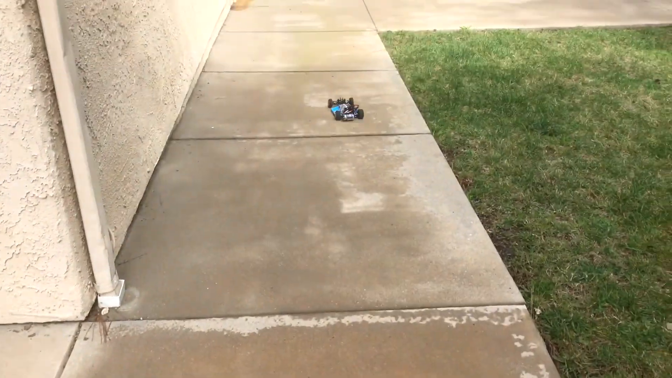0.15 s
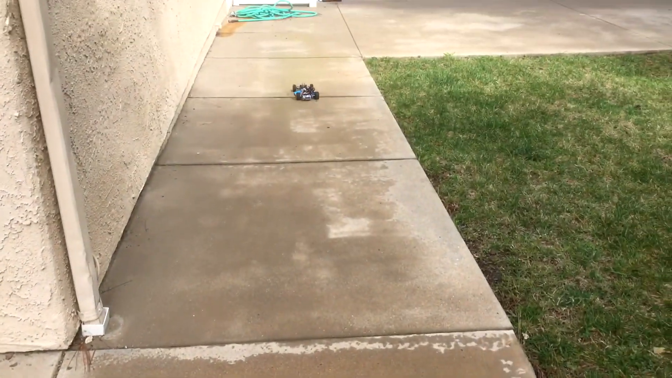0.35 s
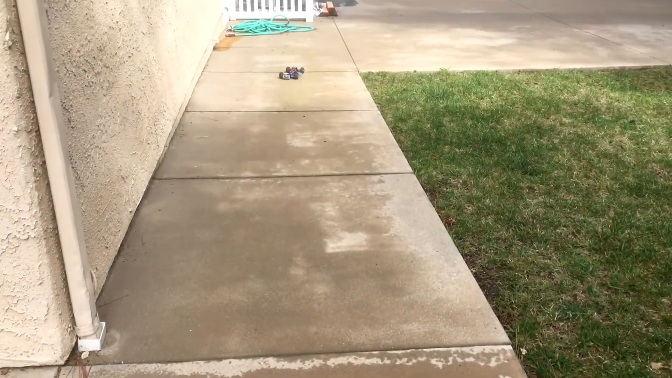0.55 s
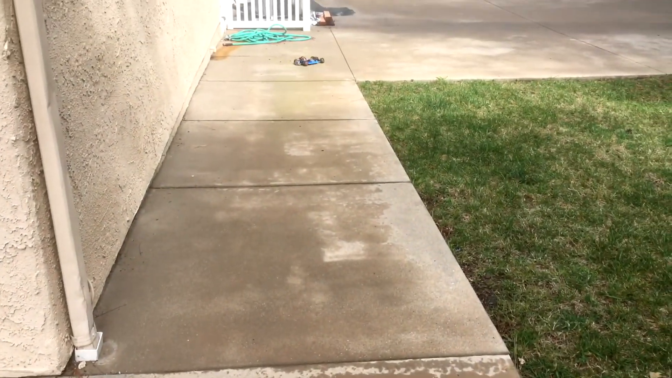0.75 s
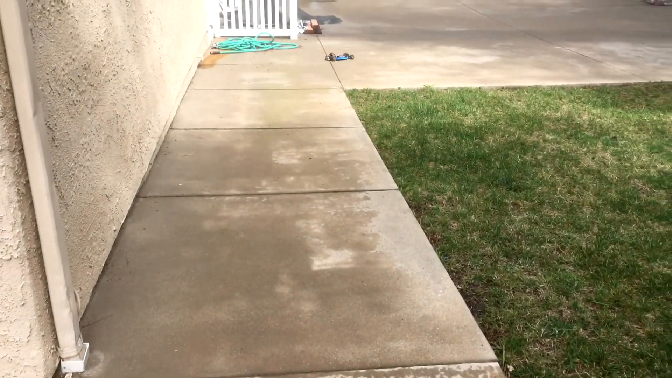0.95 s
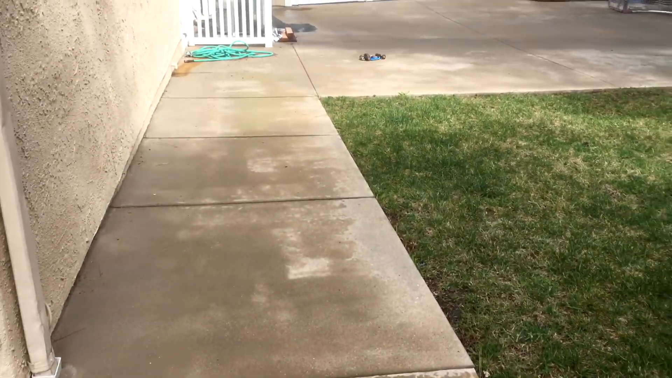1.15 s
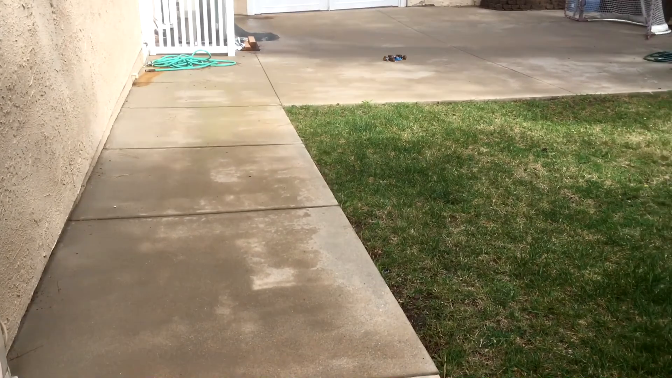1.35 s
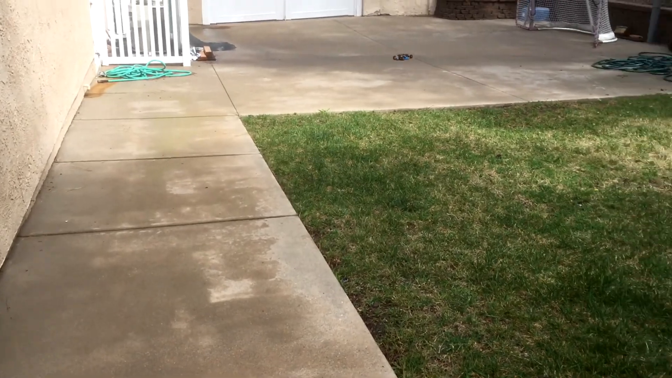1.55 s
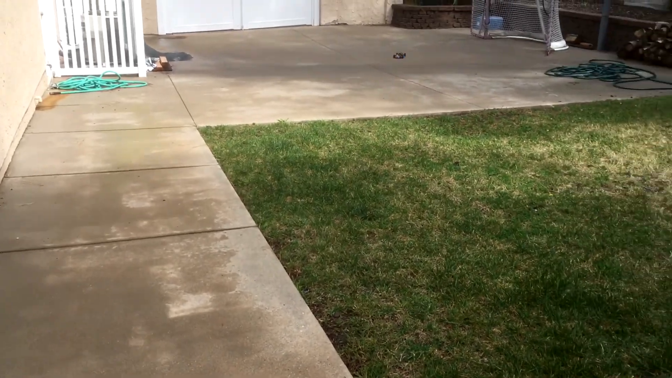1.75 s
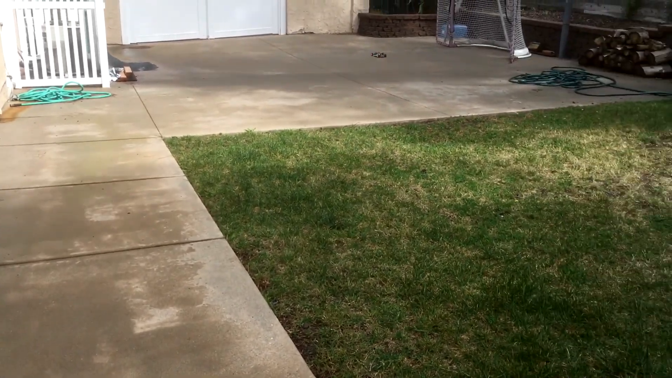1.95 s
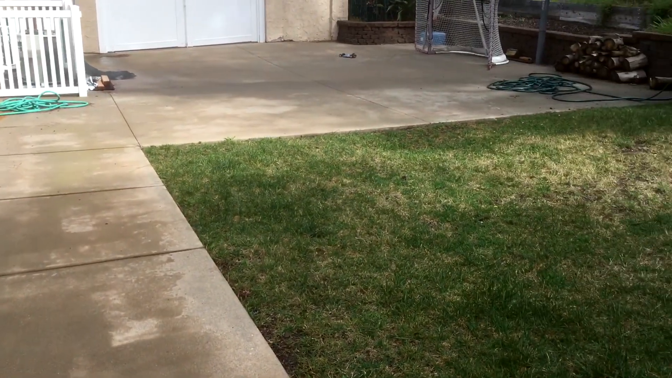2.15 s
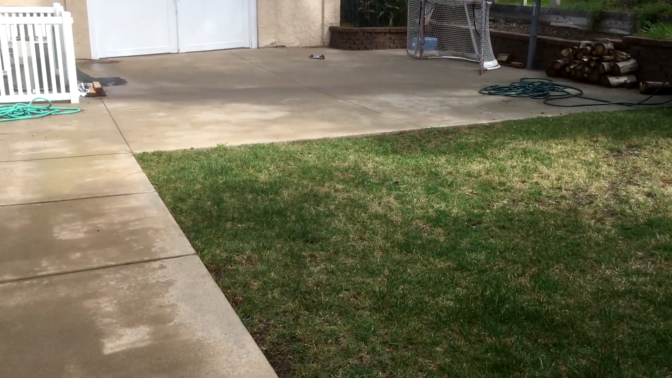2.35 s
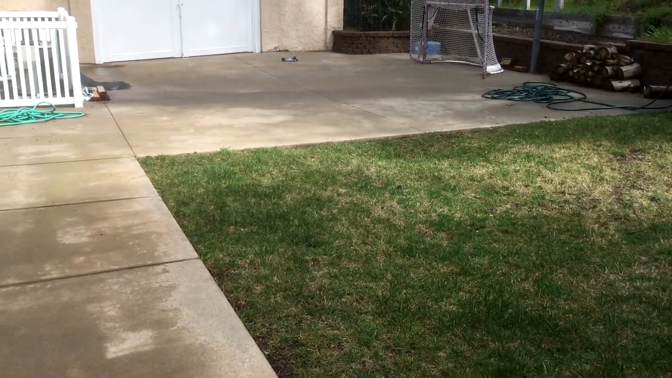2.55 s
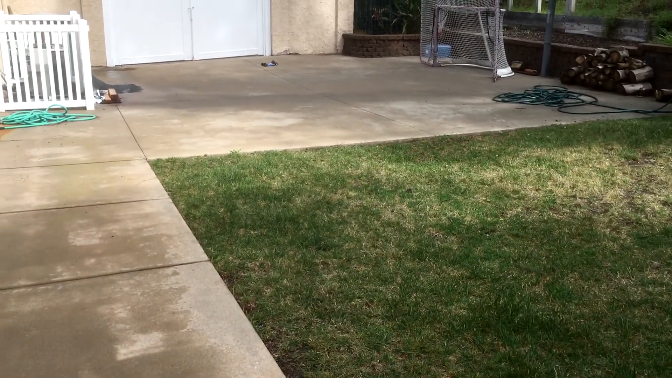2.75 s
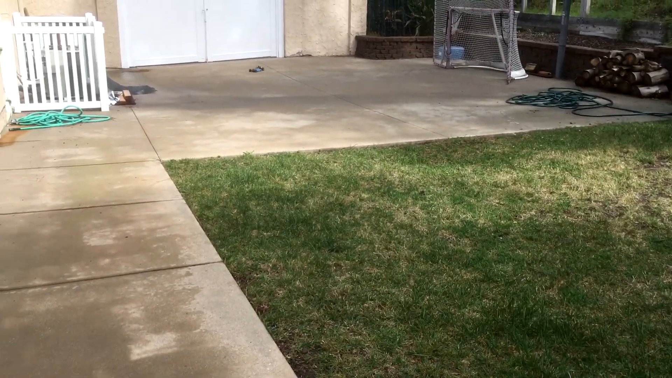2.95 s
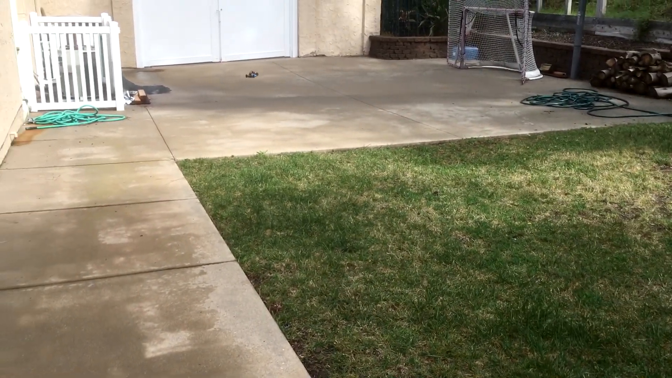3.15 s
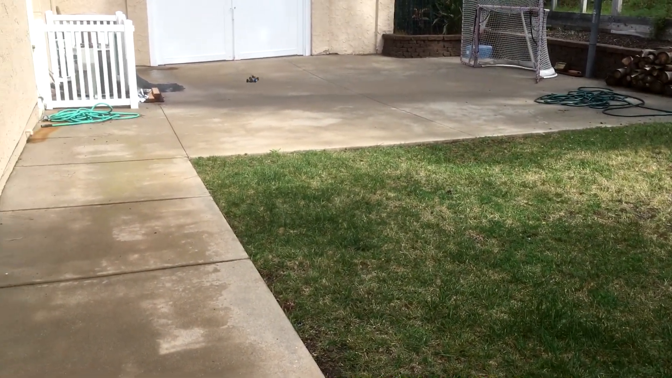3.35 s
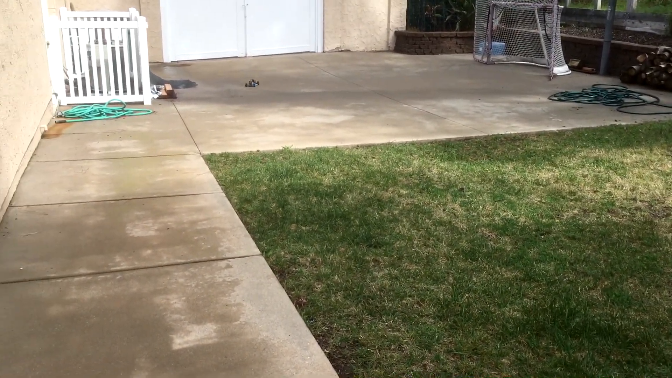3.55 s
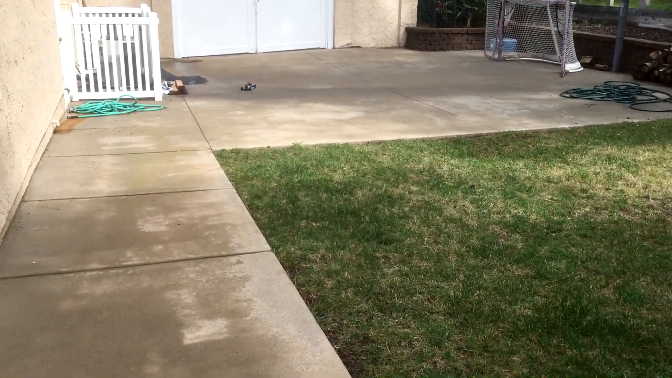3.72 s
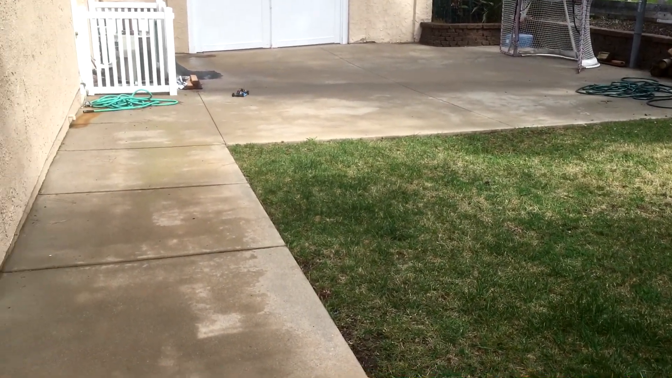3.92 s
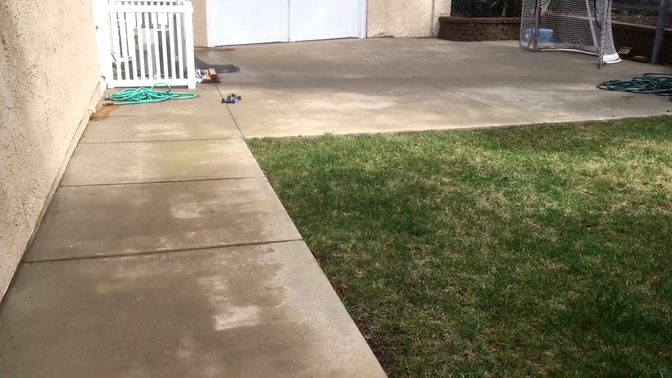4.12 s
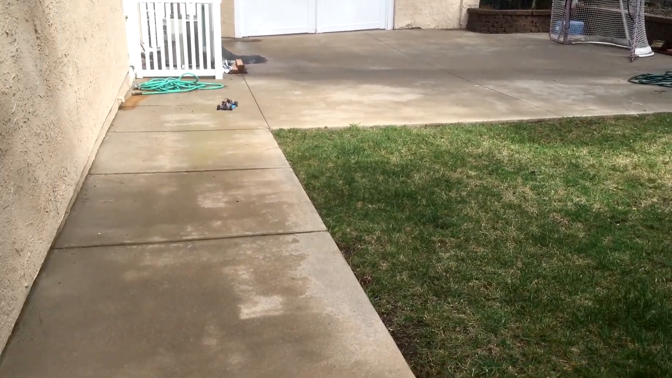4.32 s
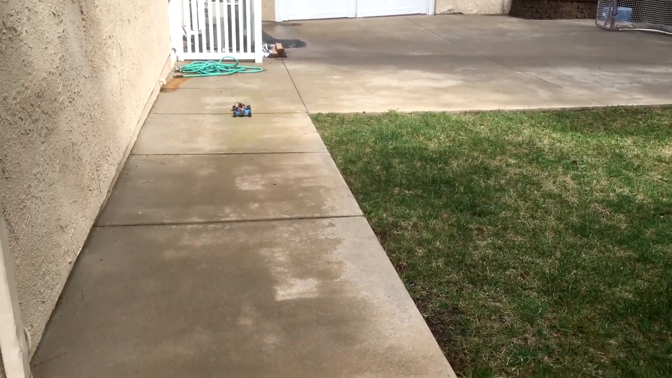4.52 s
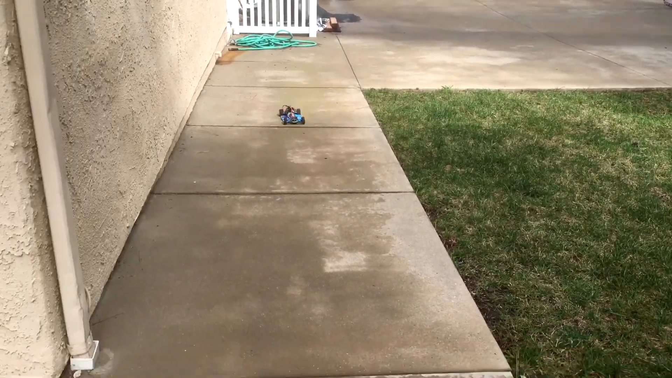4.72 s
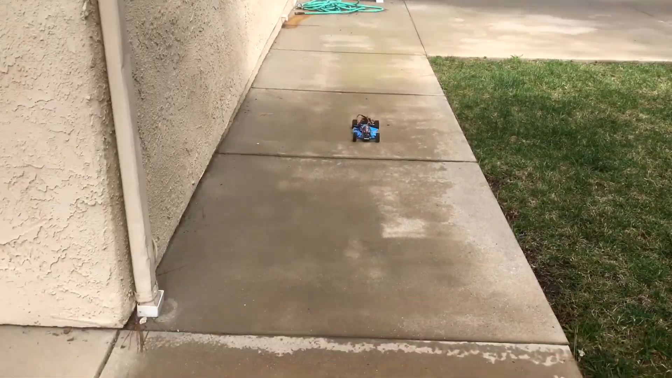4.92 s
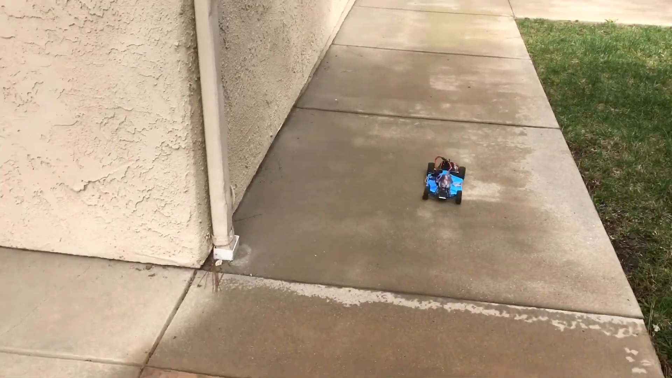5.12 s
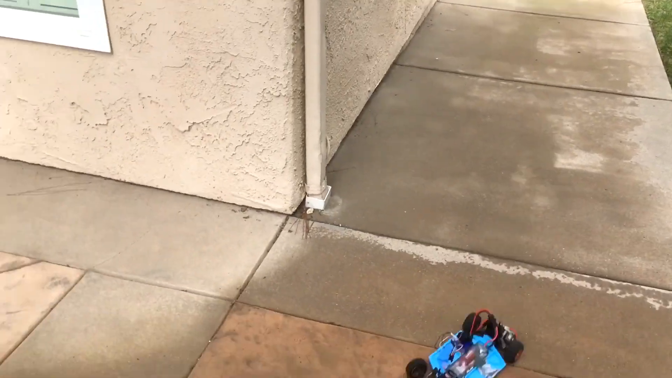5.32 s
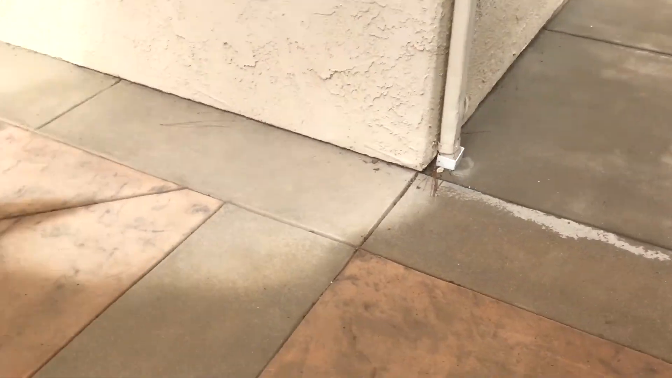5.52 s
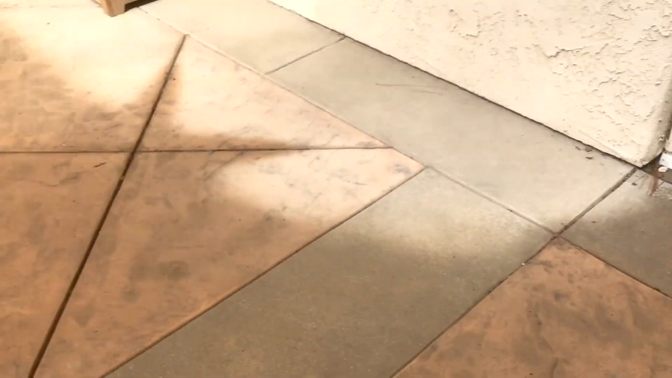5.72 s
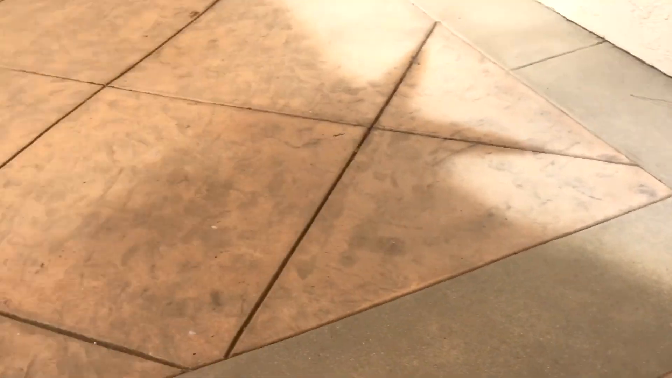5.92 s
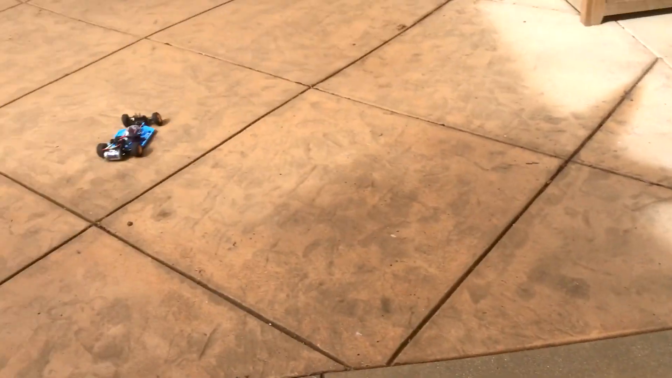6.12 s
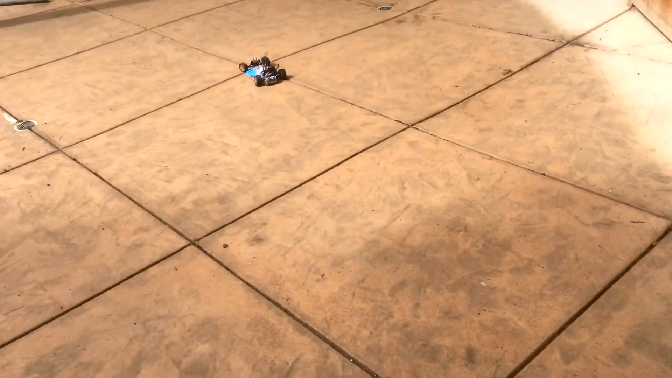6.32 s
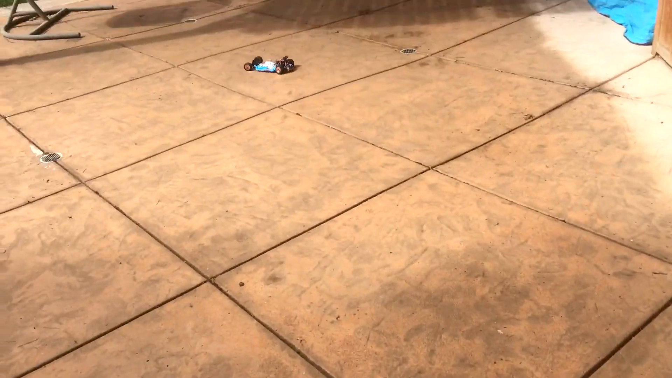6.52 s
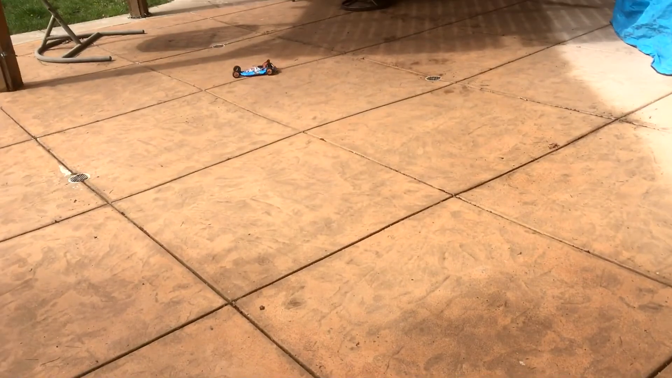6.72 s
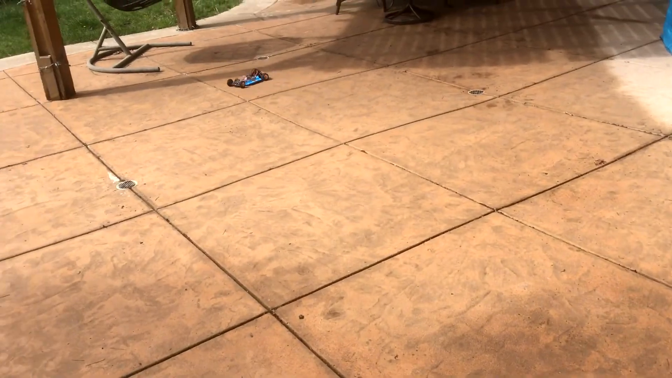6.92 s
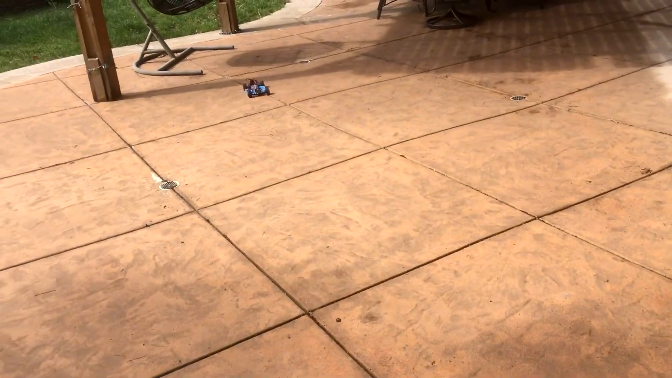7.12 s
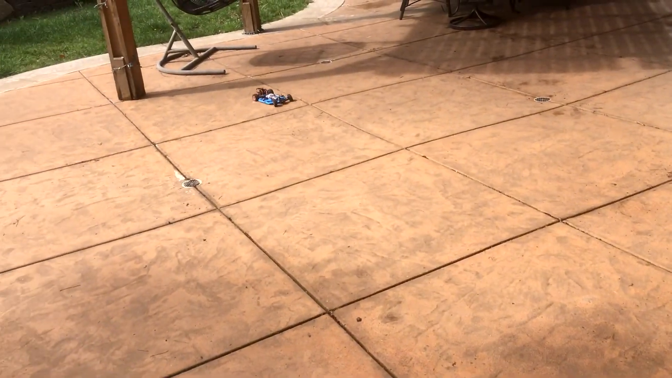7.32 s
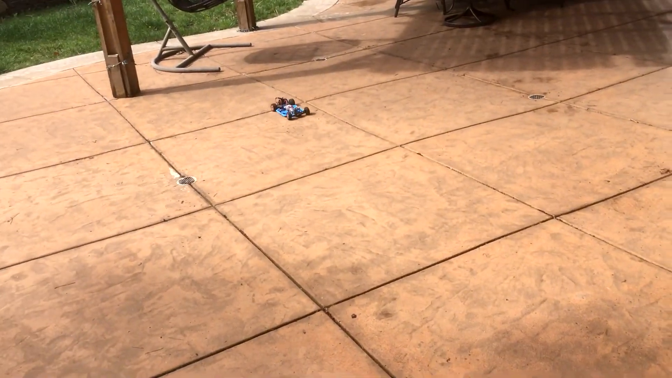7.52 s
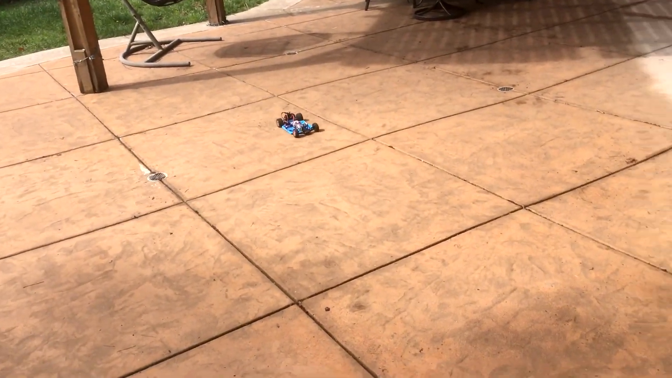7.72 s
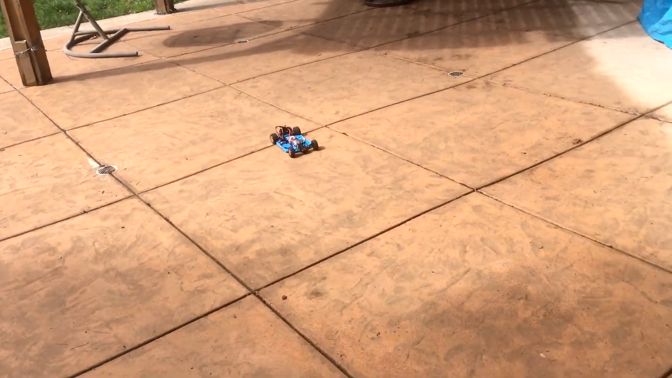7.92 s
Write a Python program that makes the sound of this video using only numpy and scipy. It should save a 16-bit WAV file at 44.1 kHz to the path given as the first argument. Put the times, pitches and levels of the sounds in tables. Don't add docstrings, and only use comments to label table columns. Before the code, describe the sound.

A small electric model car whines and rattles away over concrete, turns far off, returns fast, clatters past close over joints, then slows and picks up again.

```python
import sys
import numpy as np
from scipy import signal
from scipy.fft import rfft, irfft, next_fast_len
from scipy.io import wavfile
from scipy.ndimage import uniform_filter1d, map_coordinates

SR = 44100
rng = np.random.default_rng(int(sys.argv[2]) if len(sys.argv) > 2 else 0)


def volts_from_db(level):
    exponent = np.asarray(level, float) / 20
    return 10 ** exponent


def output_pcm(signal):
    pcm = np.clip(np.atleast_2d(signal).T, -1, 1) * 32767
    wavfile.write(sys.argv[1], SR, np.round(pcm).astype(np.int16))


N = 355887


def unit(x):
    return x / np.sqrt(np.mean(x ** 2) + 1e-20)


def curves(rows):
    times, *columns = np.transpose(rows)
    return [np.interp(np.arange(N) / SR, times, column) for column in columns]


def wobble(rate):
    knots = rng.standard_normal(int(N * rate / SR) + 4)
    return map_coordinates(knots, [np.arange(N) * rate / SR])


def swells(rows):
    centre, width = np.transpose(rows)[:2, :, None]
    t = np.arange(0, N, 16) / SR
    bells = np.exp(-0.5 * ((t - centre) / width) ** 2)
    return np.repeat(bells, 16, axis=1)[:, :N]


def swelling(rows, column):
    return np.transpose(rows)[column] @ swells(rows)


def filtered(x, response):
    size = next_fast_len(N + 8192)
    spectrum = rfft(x, size) * response(np.fft.rfftfreq(size, 1 / SR))
    return unit(irfft(spectrum, size)[:N])


def colour(points):
    f, db = np.transpose(points)
    return lambda hz: volts_from_db(np.interp(np.log(hz + 1), np.log(f), db))


def ringing(modes, order=1):
    def response(f):
        total = 0
        for k, (centre, width, db) in enumerate(modes):
            damping = 1j * f * width
            sign = (-1) ** k
            total = total + sign * volts_from_db(db) * damping / (centre ** 2 - f ** 2 + damping + 1)
        return total ** order
    return response


def rush(patchy_db):
    z = signal.stft(rng.standard_normal(N), nperseg=512)[2]
    field = uniform_filter1d(rng.standard_normal(z.shape), size=6, axis=0)
    field = uniform_filter1d(field, size=12, axis=1)
    return signal.istft(z * volts_from_db(patchy_db * unit(field)), nperseg=512)[1][:N]


def slide(x, shift_hz):
    turning = np.exp(2j * np.pi * np.cumsum(shift_hz) / SR)
    return np.real(signal.hilbert(x, next_fast_len(N))[:N] * turning)


# (f/Hz, level/dB)
BUFFET_COLOUR = [(12, -45), (20, -34), (39, 2.5), (59, 8.5), (151, -7), (176, -43), (200, -30), (260, -39),
                 (440, -120)]
# (f/Hz, level/dB)
YARD_COLOUR = [(60, -28), (100, -7), (350, -2), (550, -5.5), (950, 1), (1700, -6), (2400, -7),
               (4500, -11.5), (6400, -5.5), (7900, -10.5), (9200, -4), (10400, -10), (13000, -10)]
# (t/s, half width/s, level/dB)
GUSTS = [(0.04, 0.022, -57), (0.5, 0.029, -56), (0.76, 0.04, -60), (1.02, 0.042, -54), (1.22, 0.048, -56),
         (1.37, 0.025, -44), (1.51, 0.022, -44), (3.299, .2, -71.5), (3.6, 0.03, -49), (3.84, .06, -57),
         (4.22, 0.04, -43), (4.379, .03, -60), (4.92, 0.084, -67), (6.94, 0.057, -55), (7.91, 0.051, -61)]
# (t/s, level/dB)
BREEZE = [(0, -61.5), (5.0, -58.5), (5.5, -68), (6.8, -68), (7.1, -61.5)]


def air():
    buffet = filtered(rng.standard_normal(N) * volts_from_db(1.4 * wobble(18)), colour(BUFFET_COLOUR))
    wind = volts_from_db(np.transpose(GUSTS)[2]) @ swells(GUSTS) + volts_from_db(curves(BREEZE)[0])
    hum = filtered(rush(1.0), colour(YARD_COLOUR))
    return volts_from_db(-4) * wind * buffet + volts_from_db(-48) * hum


# (t/s, lag/ms, level/dB)
WALL_ECHO = [(0.0, 1.46, -22), (0.38, 0.787, -11), (0.62, 0.505, -14), (0.8, 0.5, -14), (1.06, 0.76, -11),
             (1.75, 2.0, -14), (2.0, 2.28, -22), (2.4, 2.05, -20), (3.4, 1.25, -21), (4.4, 0.644, -13),
             (4.6, 0.452, -22), (5.0, 0.452, -30), (5.4, 0.3, -22), (5.65, 0.24, -20), (5.9, 0.35, -16),
             (6.25, 0.27, -12), (6.6, 0.3, -30)]
# (t/s, lag/ms, level/dB)
GARAGE_ECHO = [(2.3, 1.22, -30), (2.6, 1.23, -20), (2.98, 1.14, -22), (3.25, 0.945, -22), (3.4, 0.86, -15),
               (3.85, 0.614, -15), (4.1, 0.614, -30)]


def walls(x):
    dulled = signal.filtfilt([0.8, 0.2], 1, x)
    out, power = x.copy(), 1
    for rows in (WALL_ECHO, GARAGE_ECHO):
        lag_ms, echo_db = curves(rows)
        gain = np.minimum(volts_from_db(echo_db + 3), 0.8)
        out += gain * map_coordinates(dulled, [np.arange(N) - lag_ms * SR / 1000], order=3)
        power = power + gain ** 2
    return out / np.sqrt(power)


# (t/s, half width/s, f/Hz, level/dB)
HUMS = [(0.08, 0.088, 6250, -50), (0.67, .05, 3150, -54), (1.15, 0.2, 6540, -53), (2.63, 0.065, 1687, -55),
        (2.8, .08, 1750, -60), (3.35, .12, 6660, -55), (3.66, 0.2, 1740, -53), (3.78, 0.033, 4700, -53),
        (5.13, .08, 9500, -41), (5.48, .02, 7300, -43), (5.54, .03, 11900, -40), (5.69, .045, 5950, -42),
        (6.28, 0.049, 3033, -44), (6.3, .025, 9100, -39), (6.585, .04, 6400, -40), (6.7, 0.04, 6850, -47),
        (6.9, 0.085, 5950, -48), (7.1, 0.06, 6140, -52), (7.64, .03, 6300, -53), (7.7, 0.061, 5170, -53),
        (7.92, 0.055, 6280, -50)]


def hums():
    _, _, hz, db = np.transpose(HUMS)[:, :, None]
    blur = 0.04
    drift = 2 * np.pi * np.cumsum(1 + blur * unit(wobble(700))) / SR
    return np.sum(volts_from_db(db + 4.2 * wobble(90)) * swells(HUMS) * np.sin(hz * drift), axis=0)


# (t/s, peak level/dB, ring f/Hz, crack level/dB)
KNOCKS = [(0.4067, -32, 3150, 0), (0.599, -33, 3400, -12), (0.7137, -38, 1800, -14), (0.99, -23, 2600, -4),
          (1.8004, -38, 2980, -6), (2.64, -40, 1600, -12), (3.5698, -27, 1600, -12),
          (5.1203, -45, 3020, -1), (5.2619, -22, 2980, -9), (5.2912, -25, 2900, -4),
          (5.325, -17, 3120, -11), (5.3878, -6.5, 2400, -11), (5.451, -17, 1140, -14),
          (5.525, -21, 1320, -14), (5.5386, -15, 1050, -13), (5.5586, -17, 1150, -11),
          (5.665, -15, 1510, -12), (5.7035, -5.5, 1600, -15), (5.735, -10, 1500, -15),
          (5.8606, -4, 2520, -12), (7.7752, -25, 1500, -2), (7.91, -18.5, 1720, -19)]


def knocks():
    out, t = np.zeros(N + SR), np.arange(2000) / SR
    rise = 1 - np.exp(-t / 0.0016)
    shape = rise * volts_from_db(-60 * t / 0.035)
    for s, db, hz, crack_db in KNOCKS:
        thud_noise, crack_noise = rng.standard_normal((2, len(t)))
        dull = uniform_filter1d(thud_noise, size=6) - uniform_filter1d(thud_noise, size=40)
        ring = 0.51 * np.sin(2 * np.pi * hz * t) + 1.13 * dull
        crack = 0.21 * np.diff(crack_noise, prepend=0)
        start = round(s * SR)
        out[start:start + len(t)] += volts_from_db(db - 9.0) * shape * (ring + volts_from_db(crack_db) * crack)
    return out[:N]


# (t/s, level/dB)
SKIPS = [(.395, -2), (.586, -4), (.603, 7), (.681, -6), (.705, -11), (.732, -1), (.758, 4), (.894, 1.5),
         (1.839, 7), (1.896, 3), (3.127, -7), (3.7, 4), (4.809, 4.5), (5.053, 4), (5.083, -2), (5.119, 2),
         (5.208, 3), (5.263, 3.5), (5.279, -5), (5.296, 5), (5.318, 6.5), (5.329, 4), (5.349, 4),
         (5.375, -5), (5.429, 1), (5.441, -6), (5.47, -1), (5.49, 4), (5.504, -4), (5.539, 0), (5.562, 5.5),
         (5.605, -3), (5.665, 1), (5.706, 2), (5.817, -3), (5.941, -1), (5.976, -6), (6.297, 4),
         (6.423, 3.5), (6.637, 2.5), (7.466, 0), (7.538, 2), (7.675, -8), (7.757, 1), (7.769, -7),
         (7.778, 5), (7.788, -3), (7.813, 5), (7.877, 4), (7.895, 1), (7.938, 0)]


def skips():
    times, db = np.transpose(SKIPS)
    half_width_s = 0.003
    bell = np.exp(-0.5 * (np.arange(-800, 801) / SR / half_width_s) ** 2)
    hits = np.bincount(np.round(times * SR).astype(int), db, N)
    return signal.fftconvolve(hits, bell, "same")


# (f/Hz, width/Hz, level/dB)
TREAD = [(1600, 560, 0)]
# (f/Hz, width/Hz, level/dB)
SIDEWALL = [(640, 230, 0)]
# (f/Hz, level/dB)
SCRUB_COLOUR = [(350, -61), (700, -18), (1000, 3), (1300, 1), (1800, -3.5), (2300, -5.5), (4500, -11.5),
                (8000, -30)]
# (t/s, half width/s, tread level/dB, scrub level/dB, sidewall level/dB)
TYRE_SPELLS = [(0.0, 0.078, -56, -51.5, -54), (0.5, 0.18, -67, -57, -65), (0.78, 0.12, -67, -46.5, -48.5),
               (0.95, 0.12, -69, -47.5, -49.5), (2.13, .2, -55, -46, -54), (2.62, 0.087, -62, -84, -79),
               (3.62, 0.28, -56, -77, -55), (4.05, 0.082, -76, -58, -67), (4.55, 0.26, -45, -62, -57),
               (5.121, 0.23, -46.5, -49, -57), (5.4, 0.028, -39, -52, -43), (5.53, 0.11, -32, -35, -40.5),
               (5.73, 0.056, -29, -36.5, -38), (5.859, 0.051, -34, -41, -43), (6.0, 0.083, -35.5, -57, -57),
               (6.2, 0.1, -36, -53, -74), (6.48, 0.068, -43, -55, -69), (6.62, 0.12, -47, -43.5, -58),
               (6.97, 0.12, -42.5, -53, -67), (7.37, 0.15, -47, -58, -71), (7.95, 0.23, -44.5, -72, -76)]
# (tread level/dB, scrub level/dB, sidewall level/dB)
TYRE_REST = (-57, -72, -99)
# (t/s, chassis f/Hz, tread f/Hz, motor can f/Hz)
TURNING = [(0.0, 3244, 1567, 8900), (0.3, 3260, 1585, 9250), (1.0, 3140, 1507, 9120),
           (1.5, 3030, 1540, 9300), (2.7, 3010, 1713, 9340), (3.5, 2933, 1691, 9250),
           (3.93, 3023, 1767, 9370), (4.14, 2900, 1517, 9380), (4.65, 2983, 1790, 9130),
           (5.06, 2904, 1335, 9340), (5.24, 2820, 1600, 9470), (5.62, 3020, 1541, 9200),
           (5.84, 2746, 1529, 8920), (6.2, 2800, 1400, 8930), (6.61, 3088, 1479, 9320),
           (6.9, 2980, 1662, 9060), (7.33, 2833, 1470, 9520), (7.9, 2998, 1624, 9650)]


def tyres():
    spells = volts_from_db(np.transpose(TYRE_SPELLS)[2:]) @ swells(TYRE_SPELLS)
    tread_gain, scrub_gain, side_gain = spells + volts_from_db(np.c_[TYRE_REST,])
    chatter_db = 1.35 * wobble(90) + 0.35 * wobble(20) + 0.29 * skips()
    roll, slip = rush(1.1), rush(1.1)
    tread = filtered(roll * volts_from_db(chatter_db), ringing(TREAD, order=2))
    tread = slide(tread, curves(TURNING)[1] - TREAD[0][0])
    scrub = filtered(slip * volts_from_db(1.76 * chatter_db), colour(SCRUB_COLOUR))
    side = filtered(slip * volts_from_db(0.5 * chatter_db), ringing(SIDEWALL, order=2))
    return volts_from_db(-7.5) * (tread_gain * tread + side_gain * side) + volts_from_db(-1.07) * scrub_gain * scrub


# (t/s, tooth mesh f/Hz, tone level/dB)
PULLS = [
    [(0.0, 4500, -55), (0.2, 4650, -56), (0.3, 4900, -60), (0.43, 5500, -54), (0.55, 5750, -63)],
    [(0.76, 5250, -57), (0.87, 5300, -49), (0.97, 5100, -58)],
    [(1.09, 5050, -60), (1.19, 5000, -55), (1.27, 5000, -57), (1.45, 5500, -55), (1.59, 5890, -54),
     (1.64, 6350, -57), (1.7, 6700, -52), (1.8, 7010, -64)],
    [(2.1, 4650, -64), (2.25, 4600, -61), (2.45, 4550, -66)],
    [(3.5, 4250, -66), (3.75, 4750, -57), (3.8, 4750, -55), (3.84, 5000, -65), (3.9, 5250, -58),
     (4.07, 5340, -57), (4.3, 5450, -57), (4.72, 5700, -58), (4.93, 5760, -59)],
    [(4.99, 6000, -54), (5.12, 6490, -47), (5.22, 6830, -47), (5.27, 6700, -48), (5.3, 6500, -58)],
    [(5.63, 5800, -52), (5.72, 5950, -47), (5.78, 5750, -56)],
    [(5.87, 5950, -46), (5.95, 5000, -46), (5.99, 5320, -49), (6.13, 5130, -49), (6.2, 5290, -47),
     (6.236, 6000, -50), (6.272, 6275, -42.5), (6.31, 6050, -54)],
    [(6.87, 4650, -57), (6.97, 4474, -54), (7.1, 4380, -56), (7.25, 4000, -58), (7.43, 4106, -54),
     (7.586, 3754, -48), (7.612, 3376, -49), (7.63, 2940, -50), (7.65, 2880, -58)],
    [(7.835, 2930, -50), (7.926, 3120, -55), (7.958, 3440, -53), (8.0, 3750, -55), (8.07, 3990, -52)],
]


def mesh():
    mesh_hz, tone_db = curves(np.vstack(PULLS))
    loaded = 0
    for pull in PULLS:
        start, end = pull[0][0], pull[-1][0]
        loaded = loaded + curves([(start - 0.03, 0), (start, 1), (end, 1), (end + 0.03, 0)])[0]
    return mesh_hz, loaded * volts_from_db(tone_db)


# (t/s, level/dB)
NEAR = [(0.0, -36.5), (0.45, -35), (1.0, -39.5), (1.5, -41), (1.7, -46.5), (1.95, -46), (2.63, -51),
        (3.05, -49.5), (3.35, -43), (3.75, -50), (4.3, -45), (4.65, -40.5), (5.0, -41.5), (5.45, -29),
        (6.2, -34), (6.6, -36), (7.3, -41.5), (8.07, -38.5)]
# (t/s, load level/dB, can turned to us level/dB, shell turned to us level/dB)
POSE = [(0.0, -3, 1, -2), (0.33, 2, -3, -5), (0.5, 6, -3, -4.5), (0.7, -1, -0.5, -0.5), (0.85, -11, 2.5, 1),
        (1.33, -10, 3, 3.5), (1.66, 13, 3, -1.5), (1.95, 4.5, -6.5, 2.5), (2.63, -3, -4, -1),
        (3.03, -0.5, 0, -3), (3.75, 12.5, -2.5, 0), (4.45, 11.5, -6.5, -2.5), (4.75, 5.5, -5, -5),
        (5.15, 6, 2.5, 0), (5.35, 1.5, -2.5, -4), (5.5, -7, 1.5, 0), (5.7, -4, -6.5, -1),
        (5.85, 6, -2, -5.5), (6.15, -12.5, 1.5, 0.5), (6.35, -3.5, -5, -3), (6.55, -7, 3, 1.5),
        (6.85, -6, 1, 1.5), (7.3, 7, -1.5, -2), (7.55, 1, 5, 1), (7.75, -8, 4.5, 2.5), (8.07, 4.5, 1.5, -3)]
# (t/s, half width/s, level/dB, extra hiss of loose teeth level/dB)
THROTTLE = [(0.13, 0.054, 0, -3), (0.575, 0.041, -7, 0), (0.679, 0.027, -4.5, 1), (1.41, 0.02, -1.5, -2),
            (1.58, 0.02, 2, 4), (1.78, 0.013, -7.5, 2), (3.16, 0.032, -5, -4), (3.35, 0.088, -5.5, 0.5),
            (5.13, .08, 2, -1.5), (5.27, 0.055, -0.5, -3), (5.309, 0.0077, -2, 10), (5.366, 0.022, -3, -3),
            (5.391, 0.0046, 6, 4.5), (5.419, 0.02, -4.5, 2), (5.49, 0.036, -1.5, 1), (5.65, 0.032, 2.5, -3),
            (5.82, 0.041, -4, 1), (5.9, .03, 0, 3.5), (6.18, 0.044, 3, 0.5), (6.291, 0.05, 6.5, -4.5),
            (6.36, .02, 1, -1), (6.395, 0.049, -3, -3.5), (7.52, 0.043, -4.5, 4), (7.62, 0.02, 1, 0),
            (7.73, 0.049, -5.5, -1), (7.861, 0.045, 1, -3)]
# (t/s, half width/s, level/dB)
SHELL_HIDES = [(1.72, 0.049, -7), (5.15, 0.11, -4), (5.36, .03, -1.5), (5.8, 0.046, 2), (6.3, .04, 1.5),
               (7.52, 0.041, -6), (7.76, .04, -2)]
# (chassis, shell, motor can, tooth hiss); first the level/dB over the gear noise
PART_LEVELS = (-13.5, -6.5, -4, -1)
LOAD_SHARE = (0.78, 0.37, 0.36, -0.019)
STAB_SHARE = (0.98, 0.59, 1.45, 0.79)
SKIP_SHARE = (0.42, 0.83, 1.34, 0.88)


def parts():
    load_db, can_turn_db, shell_turn_db = curves(POSE)
    stab_db, slack_db = swelling(THROTTLE, 2), swelling(THROTTLE, 3)
    level = curves(NEAR)[0] + np.c_[PART_LEVELS,]
    level = level + np.outer(LOAD_SHARE, load_db)
    level += np.outer(STAB_SHARE, stab_db)
    level += np.outer(SKIP_SHARE, skips())
    level[1] += shell_turn_db + swelling(SHELL_HIDES, 2) + 0.16 * slack_db
    level[2] += can_turn_db
    level[3] += slack_db
    return level


# (f/Hz, width/Hz, level/dB)
CHASSIS = [(3000, 580, 0)]
# (f/Hz, width/Hz, level/dB)
SHELL = [(4180, 8600, 8), (4910, 260, -2), (6760, 2300, 4)]
# (f/Hz, width/Hz, level/dB)
CAN = [(9250, 1770, 0)]
# (f/Hz, level/dB)
HISS_COLOUR = [(7000, -7), (9000, 3), (10300, 7), (11900, 11), (13200, 10), (14600, 11.5), (17000, 2.5)]
# (t/s, level/dB)
BEAT = [(0, 6), (.8, 13.5), (1.3, 3.5), (3.7, 7.5), (4.4, -7), (4.7, 12), (5.3, 12.5), (7.2, 2.5), (7.6, 7),
        (8.07, 1)]


def gearbox():
    chassis_gain, shell_gain, can_gain, hiss_gain = volts_from_db(parts())
    chassis_hz, _, can_hz = curves(TURNING)
    mesh_hz, tone = mesh()
    teeth = 62
    turn = 2 * np.pi * np.cumsum(mesh_hz / teeth) / SR + 0.8 * wobble(15)
    beat_db = curves(BEAT)[0] * np.sin(turn)
    jolts_db = wobble(150) + 0.67 * wobble(30)
    narrow, broad = rush(1.2), rush(1.8)

    def rattle(noise, beat_share, jolt_share):
        return noise * volts_from_db(beat_share * beat_db + jolt_share * jolts_db)

    chassis = filtered(rattle(narrow, 0.36, 1.4), ringing(CHASSIS, order=2))
    chassis = slide(chassis, chassis_hz - CHASSIS[0][0])
    shell = filtered(rattle(broad, 0.14, 1.1), ringing(SHELL, order=2))
    can = filtered(rattle(narrow, 0.2, 0.65), ringing(CAN, order=2))
    can = slide(can, can_hz - CAN[0][0])
    hiss = filtered(rattle(broad, 0.15, 0.74), colour(HISS_COLOUR))
    body = chassis_gain * chassis + shell_gain * shell + can_gain * can + hiss_gain * hiss

    flutter = 1 + 0.016 * wobble(350) + 0.007 * wobble(30) + 0.01 * np.sin(turn)
    cycles = 2 * np.pi * np.cumsum(mesh_hz * flutter) / SR
    waver = volts_from_db(2.8 * wobble(60) + 0.6 * wobble(13) + 0.35 * beat_db)
    faster = np.sin(1.45 * cycles) + 0.93 * np.sin(2 * cycles)
    upper = filtered(waver * faster, ringing(CAN))
    whine = tone * np.sqrt(2) * waver * (np.sin(cycles) + volts_from_db(-10) * np.sin(2 * cycles))
    return body + volts_from_db(-9) * can_gain * upper, whine


def scene():
    rattle, whine = gearbox()
    echoing = walls(rattle + hums() + tyres() + knocks())
    return np.tile(echoing + whine + air(), (2, 1))


def band_limit(x):
    return signal.sosfilt(signal.butter(12, 16490, fs=SR, output="sos"), x)


def record(dry):
    hz = np.fft.rfftfreq(N, 1 / SR)
    dip_db = -2.5 * np.exp(-((hz - 10400) / 280) ** 2)
    port = volts_from_db(dip_db) * (hz < 15740)
    return band_limit(irfft(rfft(dry) * port, N))


dry = scene()
out = record(dry)
output_pcm(out)
```